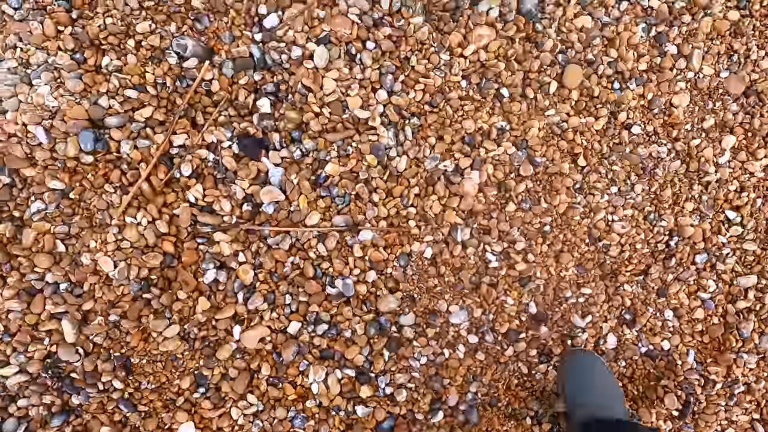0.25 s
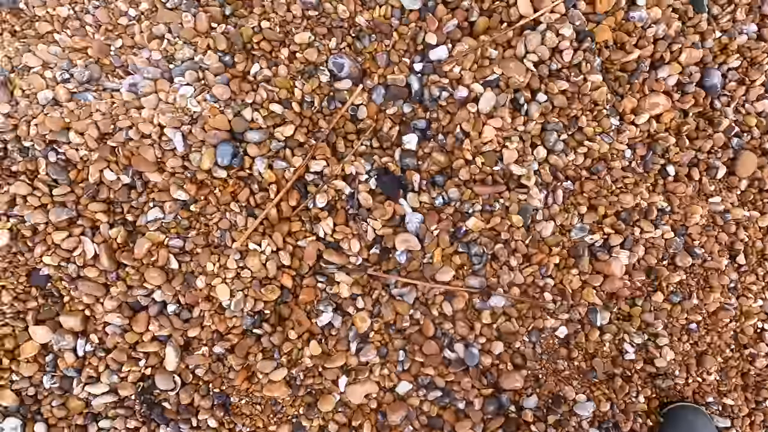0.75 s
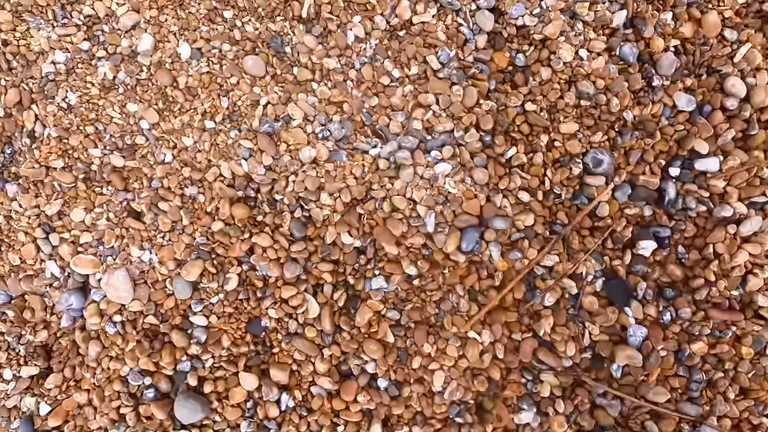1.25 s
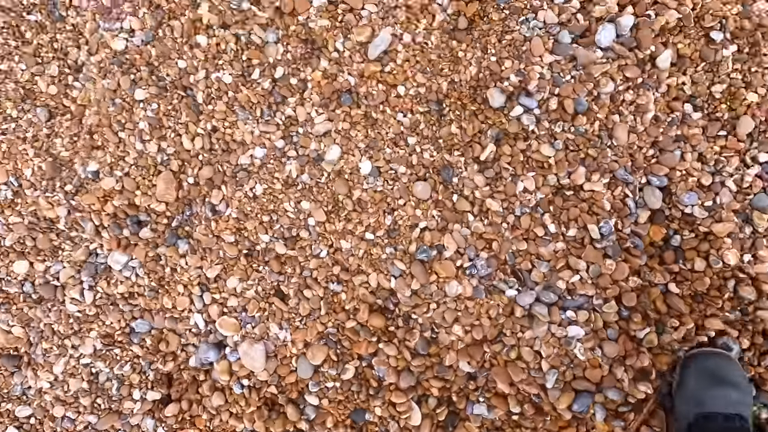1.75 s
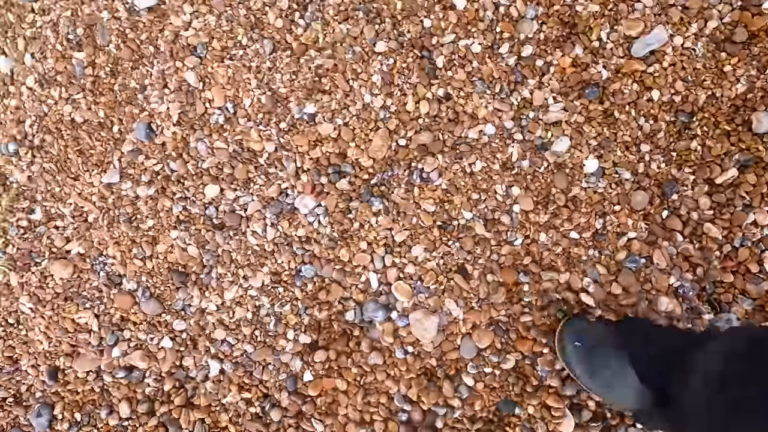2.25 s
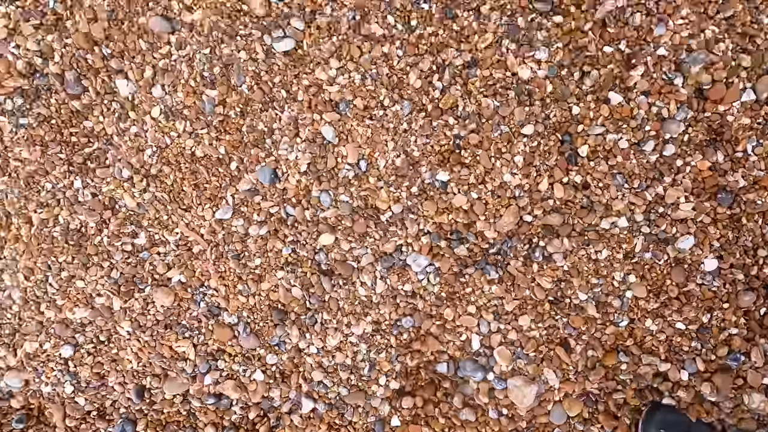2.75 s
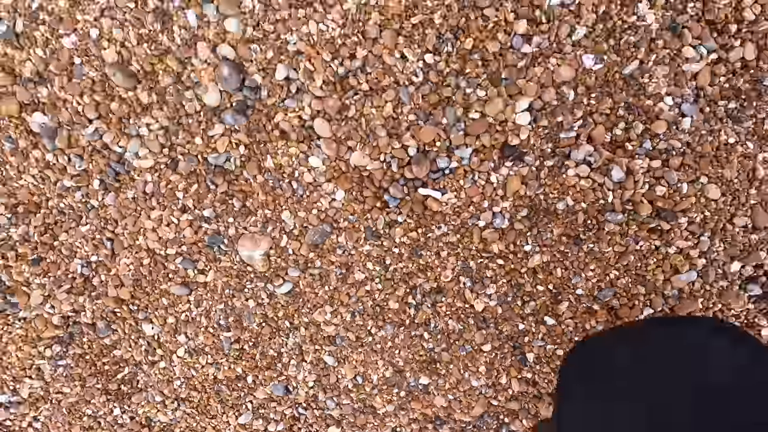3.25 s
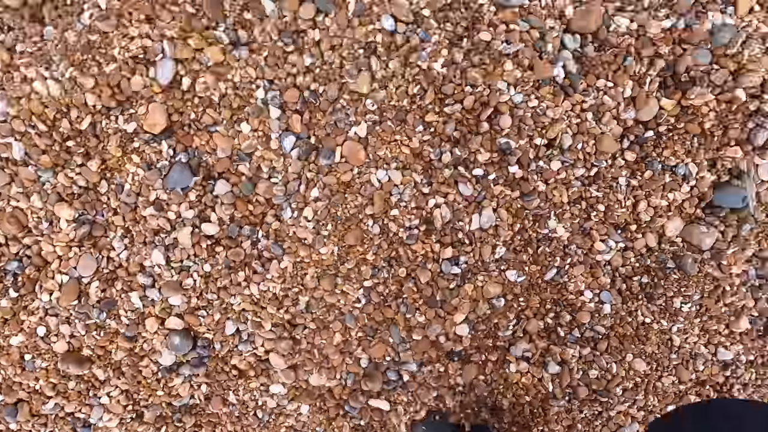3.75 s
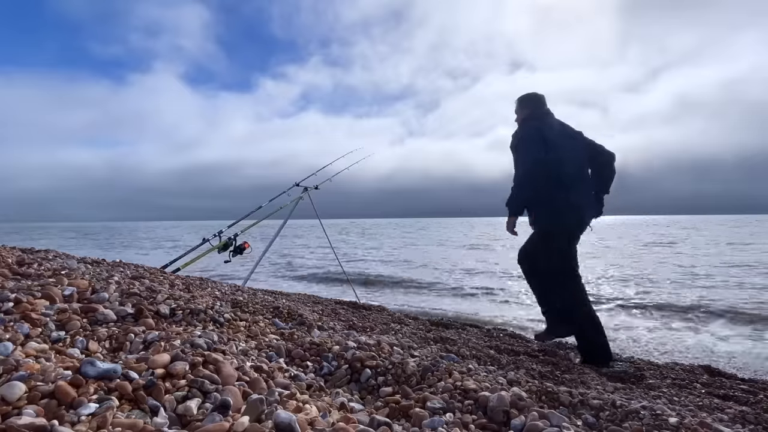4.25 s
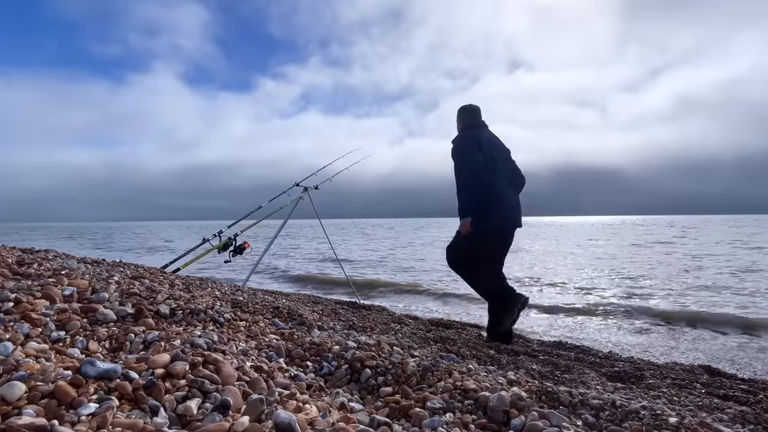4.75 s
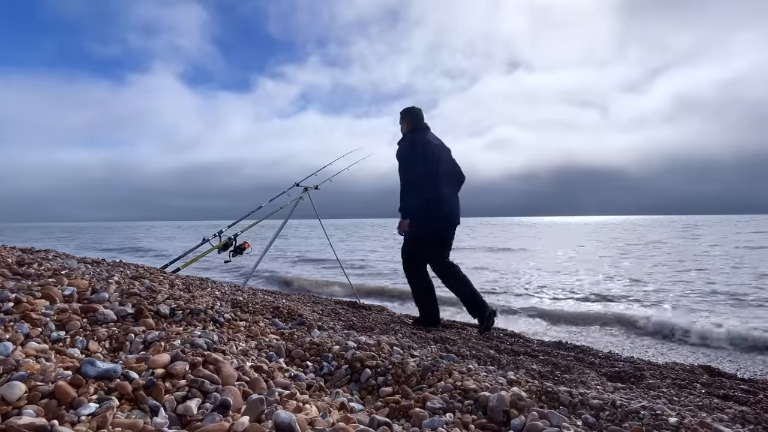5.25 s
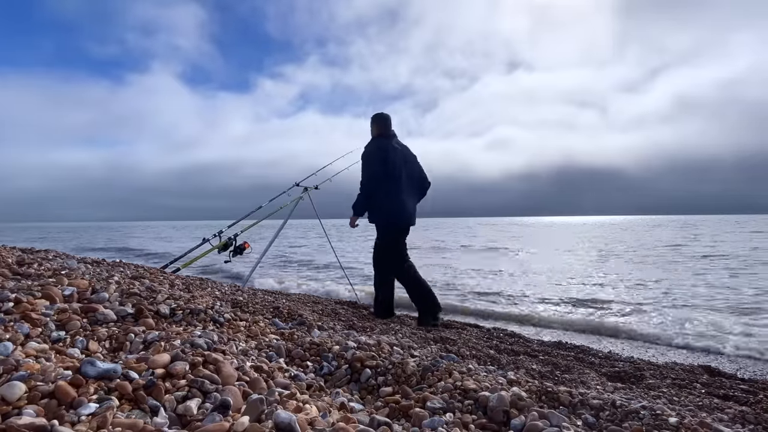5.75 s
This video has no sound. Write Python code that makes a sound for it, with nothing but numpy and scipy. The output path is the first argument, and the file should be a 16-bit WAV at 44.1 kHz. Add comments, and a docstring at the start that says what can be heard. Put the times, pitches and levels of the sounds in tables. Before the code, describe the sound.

Heavy steps grind through loose beach stones under wind rumble; a short gap, then a wide, fizzing wave wash with crisp pebble crunches.

```python
"""A shingle beach: boots crunch over the stones below a hand-held mono microphone that moans and thumps
in the wind. After a short silence, a stereo microphone lying on the stones hears a small wave wash up
while boots walk past. Stones, grit and water are trains of random impacts, filtered or ringing; wind is
filtered noise with wandering tones and thumps; a far sea of filtered noise lies under the first walk."""
import sys
import numpy as np
from scipy import signal
from scipy.fft import rfft, irfft
from scipy.io import wavfile

SR = 44100
rng = np.random.default_rng(int(sys.argv[2]) if len(sys.argv) > 2 else 0)


def file_out(sig):
    """Save sig as 16-bit WAV at sys.argv[1]."""
    # one column per channel
    cols = np.atleast_2d(sig).T
    # limit, then scale
    lim = np.clip(cols, -1, 1)
    pcm = np.round(lim * 32767).astype(np.int16)
    wavfile.write(sys.argv[1], SR, pcm)


N = 265482
T = np.arange(N) / SR  # seconds


def gain_of(db):
    """Level law: 20 dB are a factor of ten in amplitude."""
    return 10 ** (np.asarray(db) / 20)


def columns(rows):
    """Linear interpolation: every column after the time, read at each sample."""
    s, *rest = np.transpose(rows)
    return [np.interp(T, s, c) for c in rest]


def on_log_hz(points, hz):
    """Logarithmic frequency axis: a curve is read in equal steps of pitch."""
    f, value = np.transpose(points)
    return np.interp(np.log(hz + 1), np.log(f + 1), value)


def coloured(x, points, lo_hz=0, hi_hz=SR):
    """Minimum-phase filtering; white input of power 1 gives power 1 between lo_hz and hi_hz."""
    hz = abs(np.fft.fftfreq(8192, 1 / SR))
    gain = gain_of(np.maximum(on_log_hz(points, hz), -100))
    # the Hilbert transform of the log gain is the phase of the causal filter
    phase = -signal.hilbert(np.log(gain)).imag
    taps = np.fft.ifft(gain * np.exp(1j * phase)).real[:4096]
    in_band = (hz >= lo_hz) * (hz < hi_hz)
    return signal.oaconvolve(x, taps)[:N] / np.sqrt(np.mean(gain ** 2 * in_band))


def knocks(per_s, spread_db):
    """Shot noise of power 1: random impacts; a positive spread makes a few large, a negative a few small."""
    size = gain_of(spread_db * np.minimum(rng.exponential(1, N), 5)) * rng.standard_normal(N)
    x = size * (rng.random(N) < per_s / SR)
    return x / x.std()


def flicker(per_s, depth_db):
    """Amplitude modulation by slow noise: a wandering gain of mean power 1."""
    low_pass = 1 / (1 + (np.fft.rfftfreq(N, 1 / SR) / per_s) ** 4)
    z = irfft(rfft(rng.standard_normal(N)) * low_pass, N)
    g = gain_of(depth_db * z / z.std())
    return g / np.sqrt(np.mean(g ** 2))


def burst(s, rise, t60, hold=0, change_db=0):
    """Exponential decay: swells from s on, holds while drifting by change_db, falls 60 dB per t60."""
    u = np.maximum(T - s, 0)
    drift_db = change_db * np.clip((u - rise) / (hold + 1e-9), 0, 1)
    decay_db = 60 * np.maximum(u - rise - hold, 0) / t60
    return np.minimum(u / rise, 1) * gain_of(drift_db - decay_db)


def fuzzy_tone(hz, width_hz, steady):
    """Narrow-band noise: a tone of power 1 whose size and phase wander about a steady part."""
    r = np.exp(-np.pi * width_hz / SR)
    two_poles = np.convolve([1, -r], [1, -r])
    drift = signal.lfilter([1], two_poles, rng.standard_normal((2, N)))
    wander = steady + (drift[0] + 1j * drift[1]) / drift.std()
    x = (wander * np.exp(2j * np.pi * np.cumsum(hz) / SR)).real
    return x / x.std()


def rings(per_s, lo_hz, hi_hz, cycles, glide, spread_db):
    """Damped resonance of small stones or bubbles: random short rings of 14 pitches, of mean power 1."""
    x = knocks(per_s, spread_db)
    pick = rng.integers(0, 14, size=N)
    out = np.zeros(N)
    for k, hz in enumerate(np.geomspace(lo_hz, hi_hz, 14)):
        turns = np.arange(int(5 * cycles * SR / hz)) * hz / SR
        # a positive glide bends the pitch upwards
        ring = np.exp(-turns / cycles) * np.sin(2 * np.pi * turns * (1 + glide * turns / cycles))
        out += signal.oaconvolve(x * (pick == k), ring / np.linalg.norm(ring))[:N]
    return out / out.std()


def far_sea():
    """Incoherent sum: the far sea is steady filtered noise."""
    # Each row: frequency in Hz, spectrum in dB per Hz.
    sea_spectrum = [(150, -32.5), (350, -5), (720, -12), (1250, -9), (1900, -15), (3700, -11), (4400, -15),
                    (5300, -21.5), (15000, -32)]
    return gain_of(-56.5) * coloured(rng.standard_normal(N), sea_spectrum)


def buffeting():
    """Turbulent pressure: low wind noise of varying level on the shore, with a low wavering hum."""
    # Each row: time in seconds, level in dB.
    low_levels = [(4.08, -50.5), (4.4, -43), (4.93, -50), (4.98, -34), (5.12, -43.5), (5.3, -38),
                  (5.8, -50), (6.02, -54)]
    # Each row: frequency in Hz, spectrum in dB per Hz.
    low_spectrum = [(15, -21), (40, -13), (62, 4.5), (100, 0.5), (200, -7.5), (400, -41), (900, -54)]
    (low_db,) = columns(low_levels)
    low = gain_of(low_db) * coloured(rng.standard_normal(N), low_spectrum, 30, 150)
    hum = fuzzy_tone(np.full(N, 61.7), width_hz=28, steady=0.95)
    return low + gain_of(-48.5) * hum


def wind():
    """Turbulence and vortex shedding: lumpy rumble, a gliding moan with a loose undertone, thumps."""
    # Wind at the hand-held microphone.
    # Each row: time in seconds, rumble level in dB, deepest part in dB above the rumble.
    wind_levels = [(0.0, -47.5, 6), (0.9, -42, -7.5), (1.63, -45, -14), (2.02, -44.5, -19),
                   (2.38, -43.5, -26), (2.85, -51, -14), (3.05, -41.5, -10), (3.12, -51.5, -4),
                   (3.23, -64, 13), (3.44, -54.5, 2), (3.58, -45, 11), (3.75, -53, -0.5), (3.82, -52, 3),
                   (3.88, -62.5, 9)]
    # Eddies shed at the microphone port. Each row: time in seconds, pitch in Hz, level in dB.
    moan_curve = [(0.0, 100, -51), (0.3, 105.8, -45.5), (0.5, 151.8, -35.5), (0.59, 158.5, -58),
                  (0.72, 153.7, -44), (0.86, 178.2, -39), (0.96, 123.9, -30.5), (1.03, 112.9, -37.5),
                  (1.13, 149, -37), (1.26, 125.3, -40.5), (1.39, 195.4, -58), (1.54, 163.7, -47),
                  (1.62, 136.1, -33.5), (1.71, 157.3, -39), (1.77, 206.9, -48.5), (1.92, 240, -56),
                  (2.03, 194, -47), (2.2, 165, -45.5), (2.35, 152, -40.5), (2.46, 125, -37.5),
                  (2.53, 139.1, -41), (2.6, 123.2, -35), (2.7, 103, -42), (2.8, 94, -45), (2.91, 97.2, -60),
                  (3.04, 108, -51), (3.15, 124.8, -59), (3.5, 130, -74)]
    # Spectra of the rumble and of the deepest part. Each row: frequency in Hz, spectrum in dB per Hz.
    rumble_spectrum = [(25, -10.5), (50, 1), (85, 8.5), (200, -2), (350, -15.5), (700, -26.5),
                       (1500, -44.5)]
    deep_spectrum = [(8, -4), (30, 1), (45, 0), (80, -30), (200, -74.5)]
    # Gusts that thump the membrane. Each row: start in seconds, peak in dB, pitch settled on in Hz,
    # 60 dB decay time in seconds, deep push in dB above the peak.
    thumps = [(3.044, -36.5, 95.6, .1, -20), (3.544, -24.5, 118.5, 0.12, -5),
              (3.762, -29, 117.6, 0.12, -4.5)]
    rumble_db, deep_db = columns(wind_levels)
    moan_hz, moan_db = columns(moan_curve)
    rumble = flicker(22, depth_db=1.0) * coloured(rng.standard_normal(N), rumble_spectrum, 45, 95)
    deep = coloured(rng.standard_normal(N), deep_spectrum, 18, 45)
    out = gain_of(rumble_db) * rumble + gain_of(rumble_db + deep_db) * deep
    out += gain_of(moan_db) * fuzzy_tone(moan_hz, 22, steady=2.6)
    # larger eddies, shed more slowly
    out += gain_of(moan_db - 23.0) * fuzzy_tone(0.81 * moan_hz, 38, steady=0.3)
    for s, db, thump_hz, t60, push_db in thumps:
        u = T - s
        # extra turns: the pitch starts high and drops
        bend = 0.71 * thump_hz * 0.0095 * (1 - np.exp(-np.maximum(u, 0) / 0.0049))
        thump = np.sin(2 * np.pi * (thump_hz * u + bend))
        out += gain_of(db) * burst(s, 0.0066, t60, hold=0.025) * thump
        out += gain_of(db + push_db) * burst(s, 0.03, 0.25) * np.sin(2 * np.pi * 42 * u)
    return out


def wave():
    """Bubble resonance and splashing: a body of impacts and chirping bubbles under a milder-swelling fizz."""
    # Each row: time in seconds, level of the body in dB.
    wave_levels = [(4.08, -46.5), (4.33, -46), (4.47, -38.5), (4.55, -47.5), (4.82, -44.5), (5.04, -40),
                   (5.25, -39), (5.65, -37.5), (5.83, -39.5), (6.02, -40.5)]
    # Spectra of the body and of the fizz. Each row: frequency in Hz, spectrum in dB per Hz.
    body_spectrum = [(60, -16.5), (150, 1), (350, -1), (700, -5.5), (1300, -9), (2000, -18), (4000, -47)]
    fizz_spectrum = [(800, 2.5), (2000, 1.5), (4000, 1), (5400, 4), (7500, -2.5), (10300, -1), (13000, -7),
                     (14400, -8), (15000, -25), (16000, -26)]
    (body_db,) = columns(wave_levels)
    fizz_db = -46 + 0.51 * (body_db + 45)  # gains 0.51 dB per dB of body
    splashes = coloured(knocks(3000, spread_db=-1.5), body_spectrum, 242, 1000)
    bubbles = rings(250, 176.0, 1080, cycles=3.86, glide=0.058, spread_db=1.0)
    fizz = coloured(knocks(15000, spread_db=-0.2), fizz_spectrum, 1500, 7700)
    return splashes * gain_of(body_db) + bubbles * gain_of(body_db - 1) + fizz * gain_of(fizz_db)


def shore_crunches():
    """Granular impact noise: steps and a surge crunch crisp and dull at once; pebbles click around them."""
    # Crunching onsets: steps passing by, and a surge of the wave near 4.96 s.
    # Each row: start in seconds, crisp part in dB, rise in seconds, hold in seconds,
    # 60 dB decay time in seconds, dull part in dB above the crisp part.
    onsets = [(4.344, -27, 0.0041, 0.029, 0.28, -9), (4.417, -42.5, 0.016, 0.033, 1, -2.5),
              (4.462, -47, 0.0073, 0.027, 0.15, 3), (4.957, -32.5, 0.0033, 0.014, 0.2, -8.5),
              (4.996, -44.5, 0.018, 0.11, 0.83, 1.5), (5.583, -37.5, 0.023, 0.025, 0.23, -9),
              (5.841, -43, 0.012, 0.018, 0.17, -4)]
    # Small sharp pebble clicks, before and between the steps. Each row: start in seconds, level in dB.
    clicks = [(4.0856, -39.5), (4.1014, -39), (4.1166, -38.5), (4.141, -37.5), (4.1728, -38), (4.3024, -40),
              (4.311, -56), (4.641, -41), (4.7125, -53), (5.2025, -40)]
    # Spectra of the crisp and the dull part. Each row: frequency in Hz, spectrum in dB per Hz.
    crisp_spectrum = [(2000, -45), (4000, -19), (6500, -2), (8000, -7.5), (10300, 2), (13000, -2),
                      (14600, -2), (15300, -9), (16500, -17)]
    dull_spectrum = [(80, -41), (250, -2), (600, 10), (1200, -1.5), (3000, -4.5), (6000, -6), (9000, -85)]
    crisp, dull = np.zeros(N), np.zeros(N)
    for s, db, rise, hold, t60, dull_db in onsets:
        onset = gain_of(db) * burst(s, rise, t60, hold)
        crisp = np.hypot(crisp, onset)  # powers add
        dull = np.hypot(dull, onset * gain_of(dull_db))
    for s, db in clicks:
        crisp = np.hypot(crisp, gain_of(db) * burst(s, 0.0011, 0.049))
    crunch = knocks(40000, spread_db=2.0)
    return coloured(crunch * crisp, crisp_spectrum) + coloured(crunch * dull, dull_spectrum)


def shore_sound():
    """Superposition: one independent rendering of wave, buffeting and crunches, before the ports."""
    return wave() + buffeting() + shore_crunches()


def ports(shared, apart):
    """Partial coherence: the right port hears partly the left's sound, shifted in phase, partly its own."""
    # Each row: frequency in Hz, left-right likeness from 0 to 1.
    likeness = [(30, .3), (70, 0.52), (170, 1), (300, 0.65), (550, 1), (800, 0.48), (1200, 0.83),
                (1900, 0.22), (3000, 0.38), (4700, 0.48), (6700, 0.87), (8000, 0.12), (10000, 0.38),
                (12000, .99), (13300, 0.76), (15500, .99)]
    # The ports also colour the phase. Each row: frequency in Hz, radians added to the left's lead.
    phase_lead = [(0, 0), (600, -.8), (1250, .2), (1800, .7), (2050, -.65), (2700, .9), (4100, -.3),
                  (4800, .4), (5400, -.7), (5900, 0), (6300, -1.9), (7100, -.7), (7700, 2.7), (8400, 2.2),
                  (8650, -.2), (9600, 1.3), (11400, .4), (12700, .3), (15300, -2.8)]
    # Each row: frequency in Hz, level of left over right in dB.
    left_over_right = [(60, 2.5), (250, -0.5), (700, -4.5), (1300, -2), (2400, -5), (4000, -1), (5400, 2.5),
                       (7500, -3), (9200, -1.5), (10300, -5.5), (11500, 0), (15000, 0)]
    delay_s, delay_up_to_hz = 19 / SR, 7100  # the left port hears later
    hz = np.fft.rfftfreq(N, 1 / SR)
    alike = np.clip(on_log_hz(likeness, hz), 0, 1)
    tilt = gain_of(on_log_hz(left_over_right, hz) / 2)  # half the difference on each side
    lead = np.interp(hz, *np.transpose(phase_lead))
    lead = lead - 2 * np.pi * delay_s * np.minimum(hz, delay_up_to_hz)
    a, b = rfft(shared), rfft(apart)
    right = (alike * a + np.sqrt(1 - alike ** 2) * b) * np.exp(-1j * lead)
    return irfft(np.array([a * tilt, right / tilt]), N)


def underfoot():
    """Addition of powers: strides and slides together set how hard stones and grit are stirred."""
    # Boots landing and sinking in. Each row: start in seconds, rise in seconds, hold in seconds,
    # stones in dB, their change over the hold in dB, grit in dB, its change in dB.
    strides = [(0.309, 0.11, 0.077, -38, -5, -52.5, 3), (0.966, 0.047, 0.15, -39.5, -7, -46, -15.5),
               (1.573, 0.11, 0.17, -42, -2, -52, -7.5), (2.144, 0.061, .14, -45.5, 2, -55, -2.5),
               (2.78, 0.007, 0.42, -45.5, -9, -54.5, -8), (3.16, 0.039, .11, -44, -11, -46.5, -9.5)]
    # Shingle sliding back between the strides.
    # Each row: start in seconds, length in seconds, stones in dB, grit in dB.
    slides = [(0, 0.18, -59, -63), (0.546, 0.044, -50.5, -58), (0.608, 0.095, -51.5, -65),
              (0.726, 0.26, -57.5, -74), (1.139, 0.038, -59, -58), (1.219, 0.042, -53, -59),
              (1.281, 0.096, -58, -69), (1.533, 0.057, -52.5, -61), (1.88, 0.066, -53.5, -58.5),
              (1.949, .17, -53.5, -65.5), (2.351, 0.082, -51.5, -77), (2.457, .12, -75, -70),
              (2.646, 0.04, -59, -62), (2.73, 0.037, -58, -67), (3.306, .08, -54.5, -58.5),
              (3.395, 0.22, -53, -65), (3.62, .08, -56, -63.5), (3.697, 0.16, -58.5, -76)]
    stones_t60_s, grit_rise_s, grit_t60_s = 0.2, 0.036, 0.26
    slide_rise_s, slide_t60_s = 0.015, 0.13
    swell = 1.05  # power law of the sinking in
    stones, grit = np.zeros(N), np.zeros(N)
    for s, rise, hold, db, change_db, grit_db, grit_change_db in strides:
        # burst rises linearly and supplies the first power
        sinking = np.clip((T - s) / rise, 0, 1) ** (swell - 1)
        stride = sinking * burst(s, rise, stones_t60_s, hold, change_db)
        stones = np.hypot(stones, gain_of(db) * stride)
        quick = min(rise, grit_rise_s)  # the grit on top is hit first
        scatter = burst(s, quick, grit_t60_s, rise - quick + hold, grit_change_db)
        grit = np.hypot(grit, gain_of(grit_db) * scatter)
    for s, length, db, grit_db in slides:
        slide = burst(s, slide_rise_s, slide_t60_s, max(length - slide_rise_s, 0))
        stones = np.hypot(stones, gain_of(db) * slide)
        grit = np.hypot(grit, gain_of(grit_db) * slide)
    return stones, grit


def boots_near():
    """Granular friction: stones grind and ring and grit rattles under the sole, with short knocks."""
    # Short knocks: bright pebble clacks and, where the dull part is high, low heel thuds.
    # Each row: start in seconds, level in dB, dull part in dB above it.
    short_knocks = [(0.035, -52.5, -14), (0.1997, -54, 2), (0.2654, -44.5, 0), (.396, -46, 6),
                    (.81, -64, 16), (.996, -47, 6), (1.08, -62, 16), (1.2235, -56, -2), (1.398, -53, -1),
                    (1.4526, -54, 8.5), (1.5236, -57, -9), (1.5459, -48, 2), (1.5728, -49, -3),
                    (1.7302, -48, 0), (1.848, -62.5, 18), (2.0314, -55, 6), (2.0722, -49.5, 4.5),
                    (2.7383, -49.5, -12), (3.545, -69, 22)]
    # Spectra of the stones and of the grit. Each row: frequency in Hz, spectrum in dB per Hz.
    stone_spectrum = [(150, -28), (250, 2.5), (540, -4), (900, -3), (1500, -8.5), (2400, -4.5),
                      (3000, -4.5), (3700, 2), (4300, -6.5), (5000, -17.5), (7000, -22.5), (9100, -71),
                      (15400, -100)]
    grit_spectrum = [(2500, -15.5), (5000, -2.5), (7000, -2), (8500, -0.5), (11000, -4), (14000, 0),
                     (17000, -14)]
    stones, grit = underfoot()
    for s, db, dull_db in short_knocks:
        grit = np.hypot(grit, gain_of(db) * burst(s, 0.0026, 0.048))
        stones = np.hypot(stones, gain_of(db + dull_db) * burst(s, 0.0013, 0.089))
    grind = knocks(12000, spread_db=0.15) * flicker(40, depth_db=0.83)  # stones slip in clumps
    rattle = knocks(20000, spread_db=3.0) * flicker(70, depth_db=-0.26)
    ringing = rings(1800, 2214, 4406, cycles=13.0, glide=0, spread_db=0.5)
    share = 0.25  # of the grinding power, the part that rings
    body = np.sqrt(1 - share) * coloured(grind * stones, stone_spectrum, 1800, 5000)
    hiss = coloured(rattle * grit, grit_spectrum, 7000, 15000)
    # coarser grit sounds below 11500 Hz, finer above; each comes and goes on its own
    coarse = signal.sosfiltfilt(signal.butter(2, 11500, fs=SR, output="sos"), hiss)
    fine = hiss - coarse
    hiss = coarse * flicker(7.9, depth_db=2.8) + fine * flicker(9, depth_db=1.3)
    return body + np.sqrt(share) * stones * ringing + hiss


def scene():
    """Superposition in succession: the walk in mono, a silence, the shore in stereo."""
    first_ends_s, second_starts_s = 3.868, 4.079
    walk = far_sea() + wind() + boots_near()
    lumps = flicker(13.0, depth_db=0.9)  # the whole shore sound surges unevenly
    shore = ports(shore_sound() * lumps, shore_sound() * lumps)
    # short linear fades centred on the two times
    fade_out = np.clip((first_ends_s - T) / 0.011 + 0.5, 0, 1)
    fade_in = np.clip((T - second_starts_s) / 0.0038 + 0.5, 0, 1)
    return walk * fade_out + shore * fade_in


def record(dry):
    """Band limitation: a linear-phase low-pass removes what lies above its edge."""
    edge_hz = 15740
    taps = signal.firwin(511, edge_hz, window=("kaiser", 9), fs=SR)
    return signal.oaconvolve(dry, taps[None], "same")


dry = scene()
out = record(dry)
file_out(out)
```